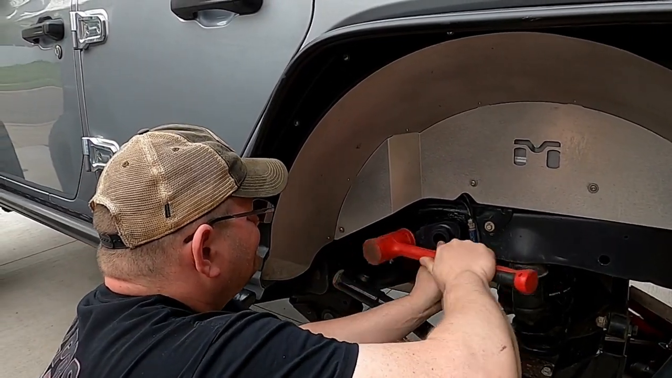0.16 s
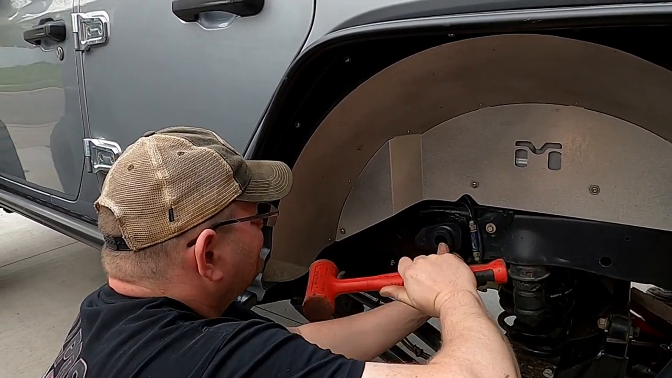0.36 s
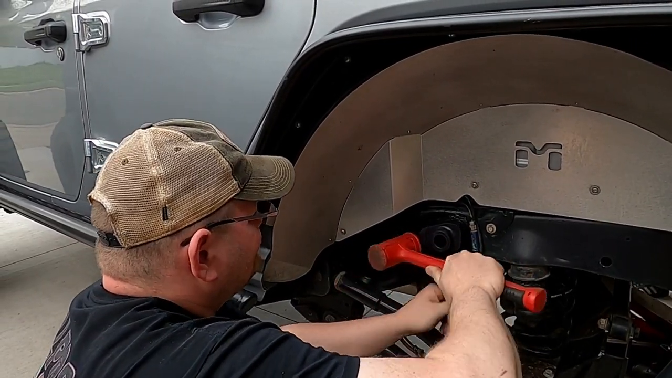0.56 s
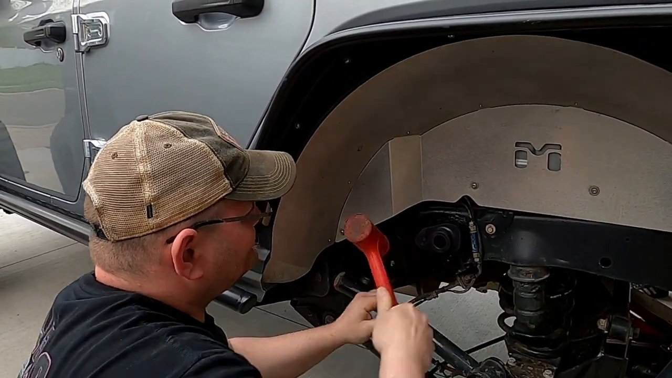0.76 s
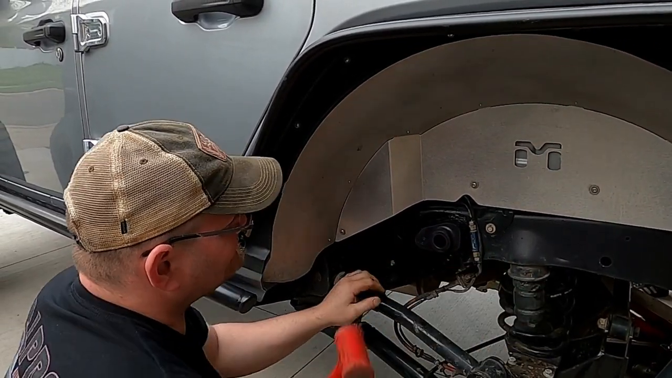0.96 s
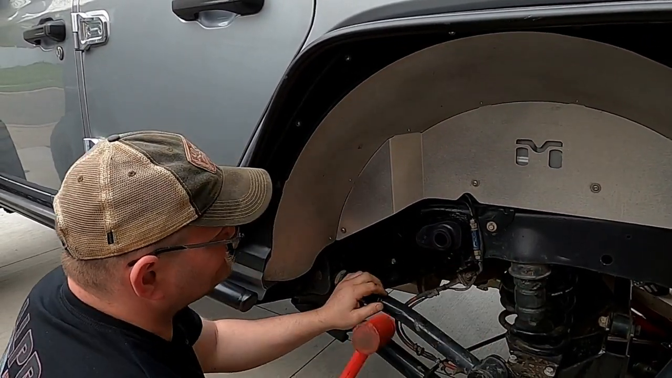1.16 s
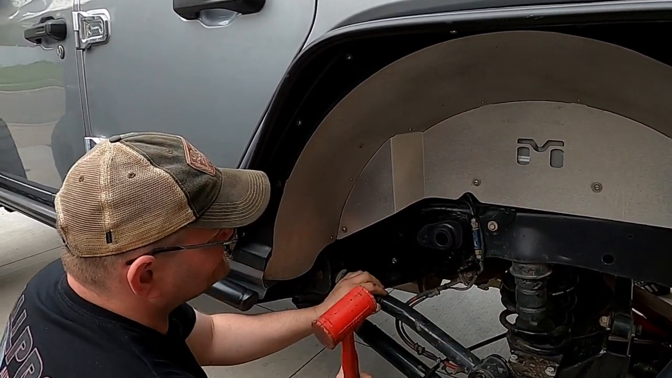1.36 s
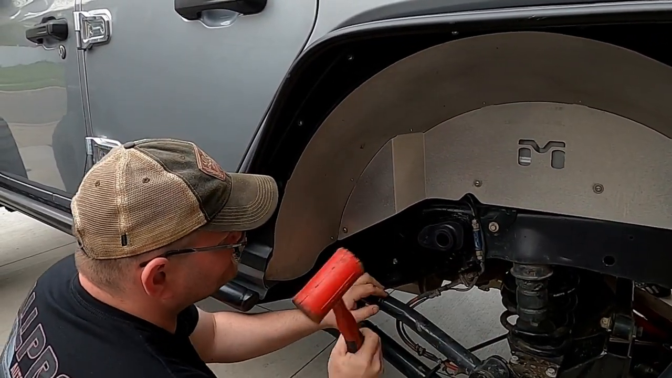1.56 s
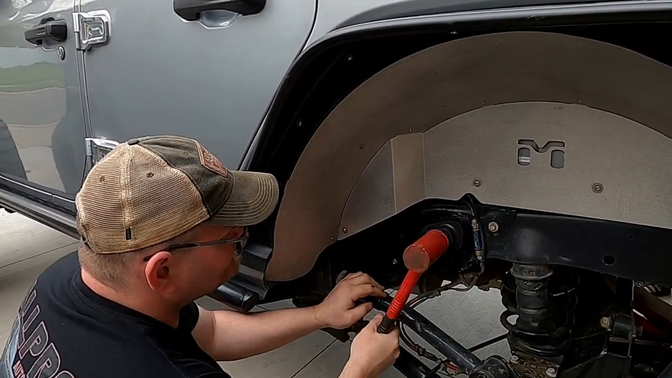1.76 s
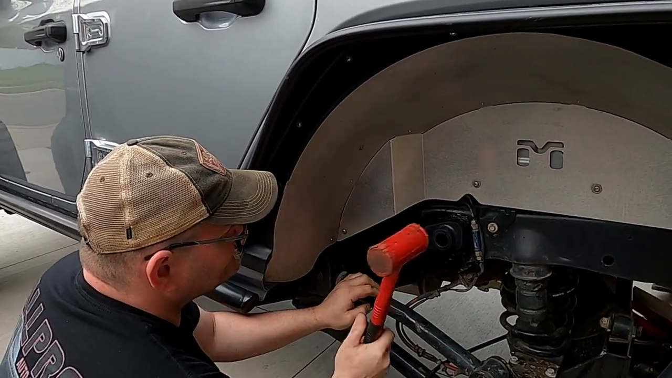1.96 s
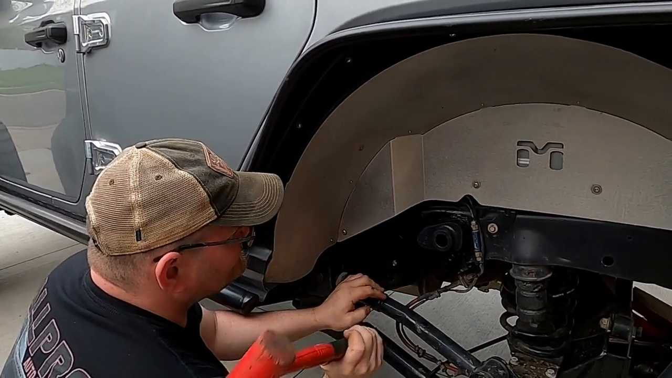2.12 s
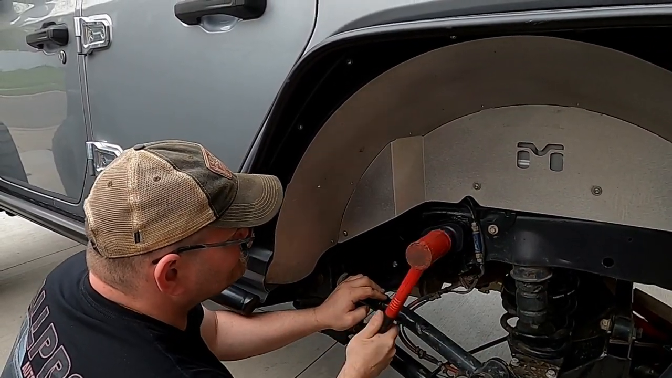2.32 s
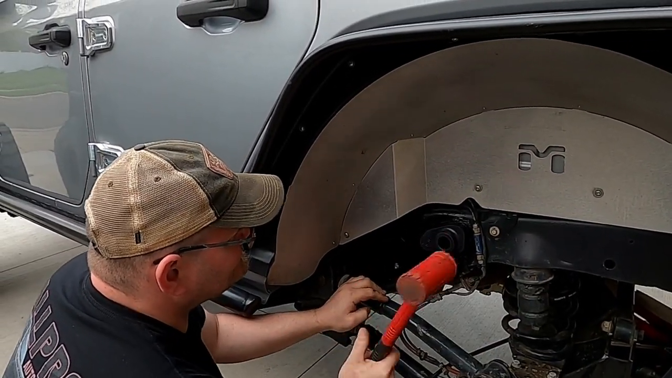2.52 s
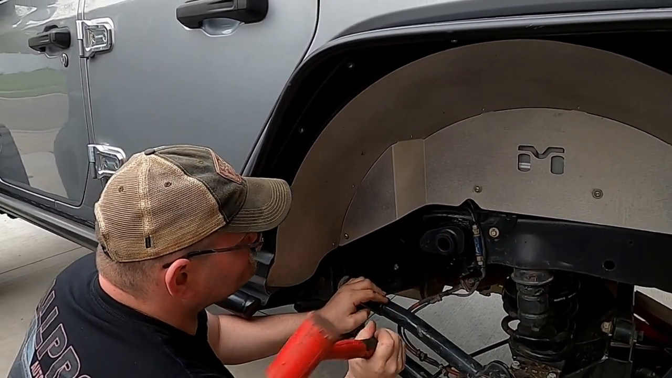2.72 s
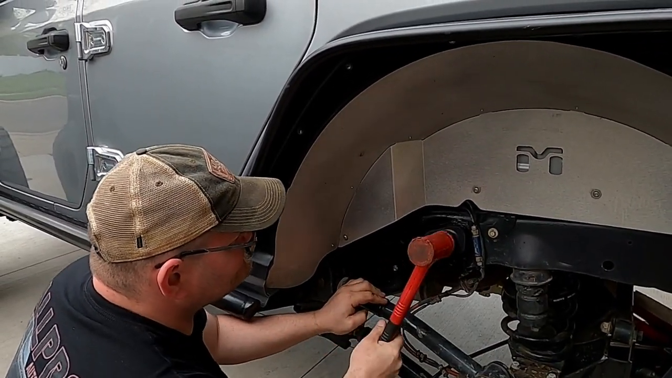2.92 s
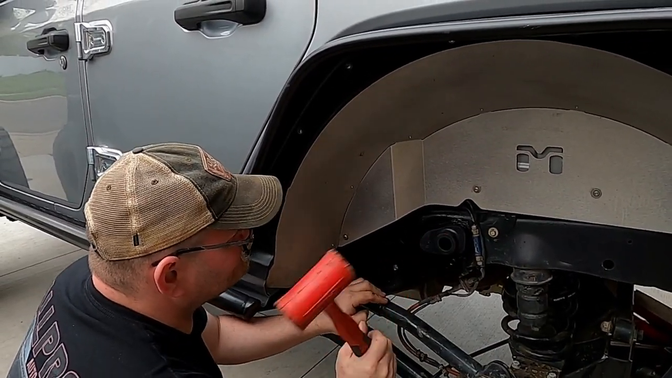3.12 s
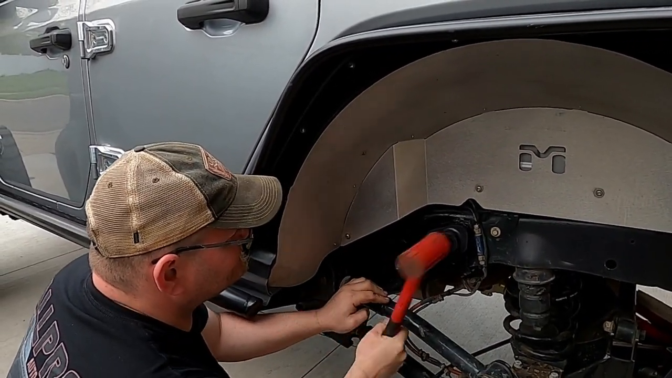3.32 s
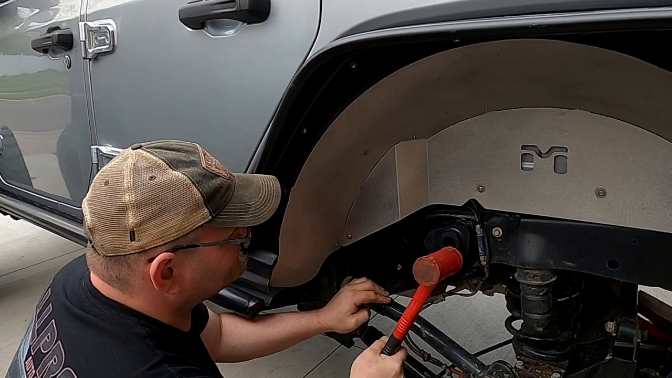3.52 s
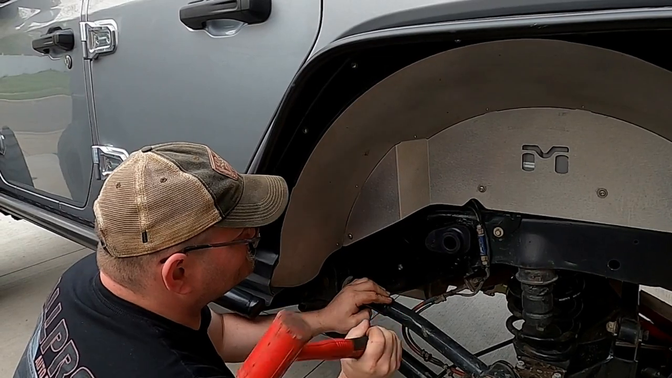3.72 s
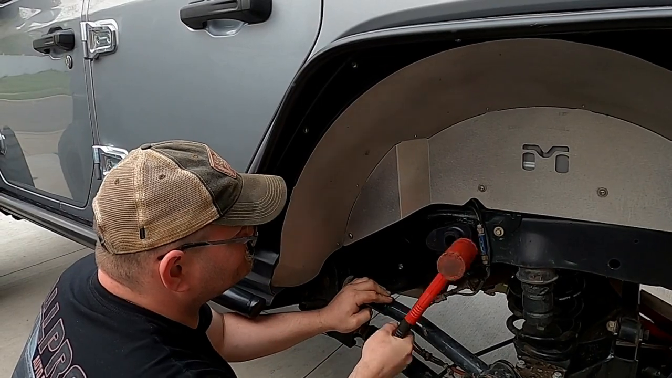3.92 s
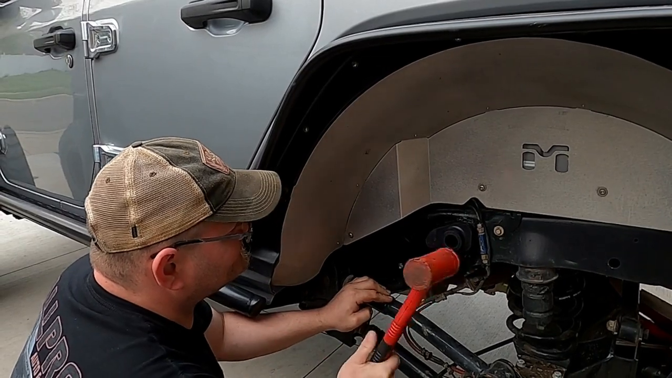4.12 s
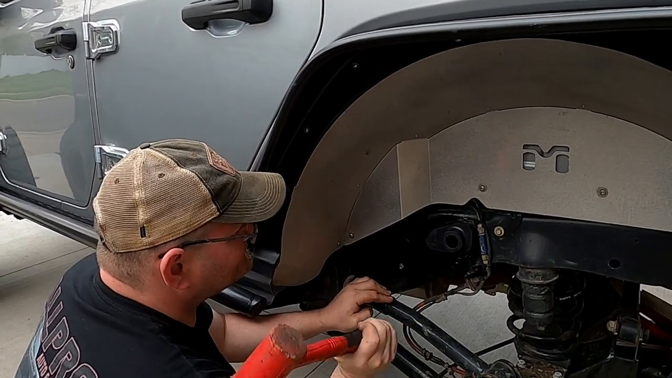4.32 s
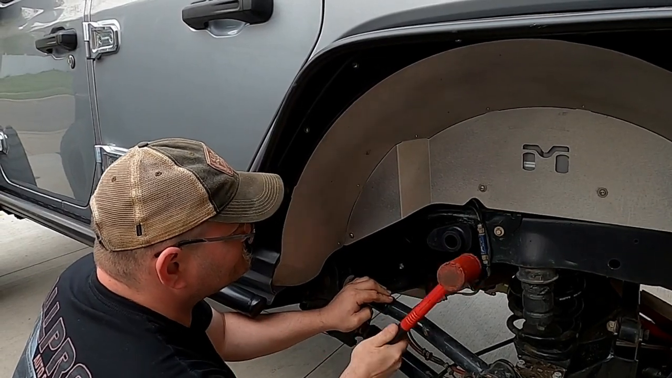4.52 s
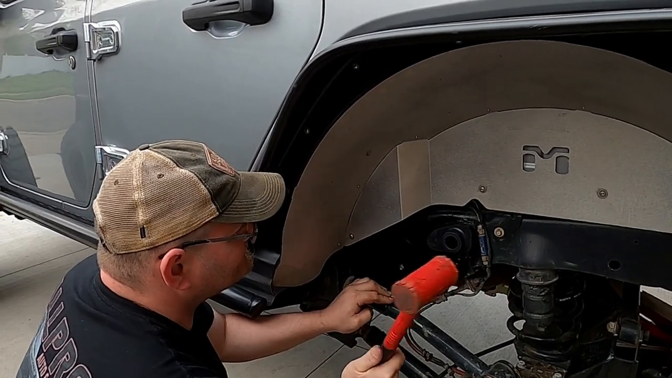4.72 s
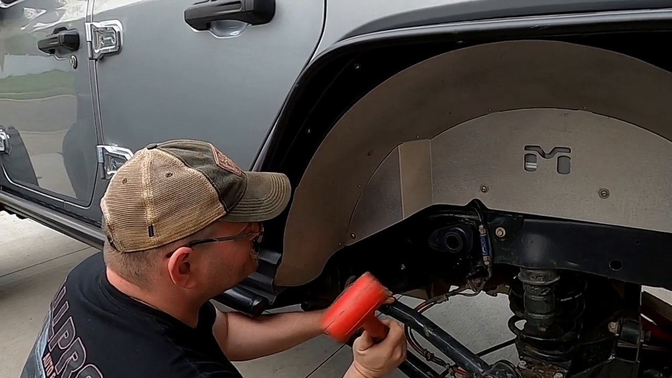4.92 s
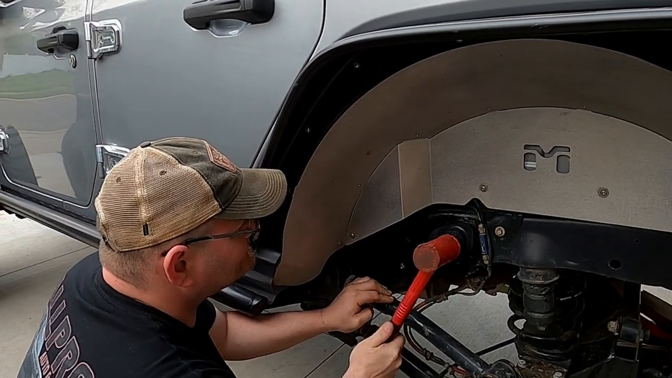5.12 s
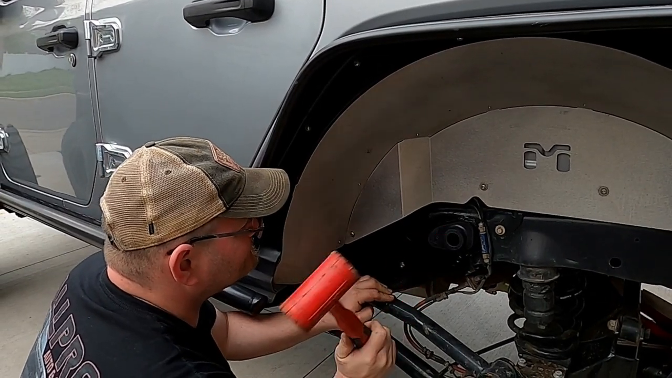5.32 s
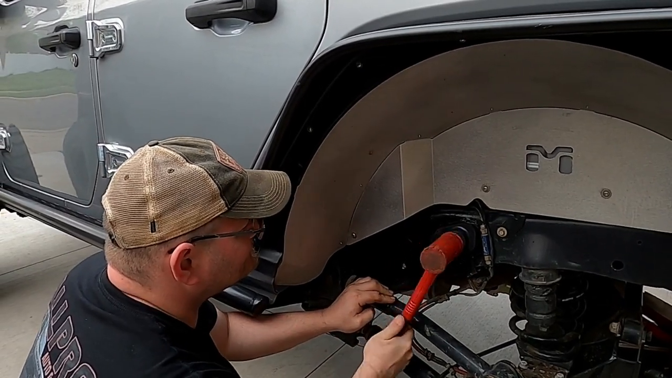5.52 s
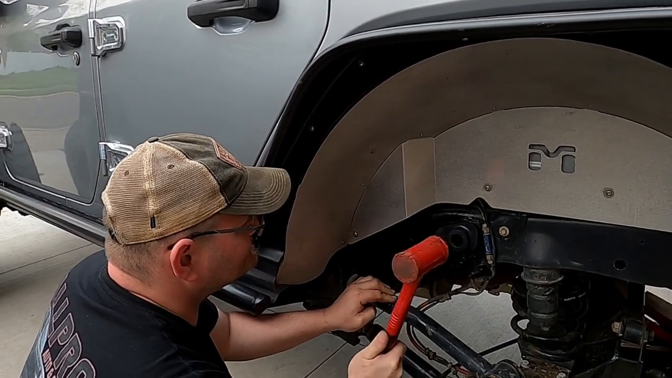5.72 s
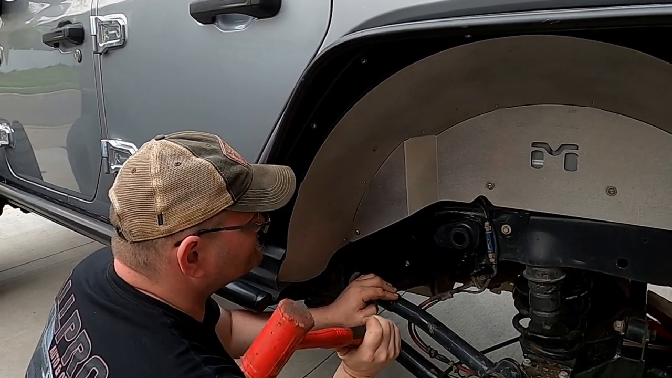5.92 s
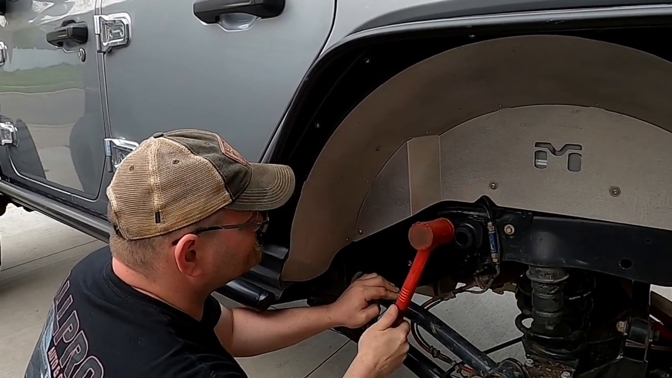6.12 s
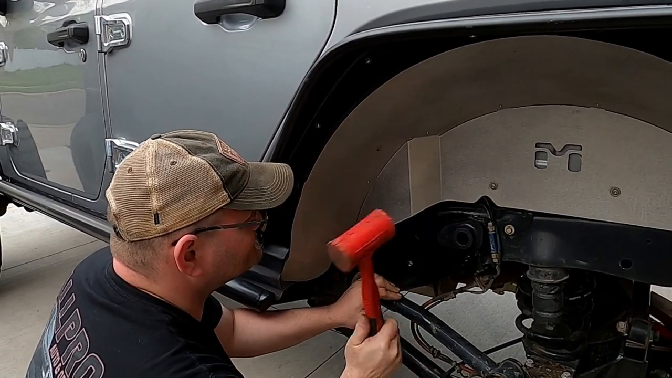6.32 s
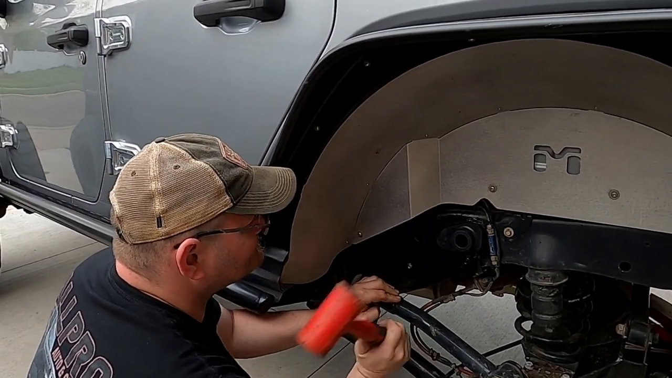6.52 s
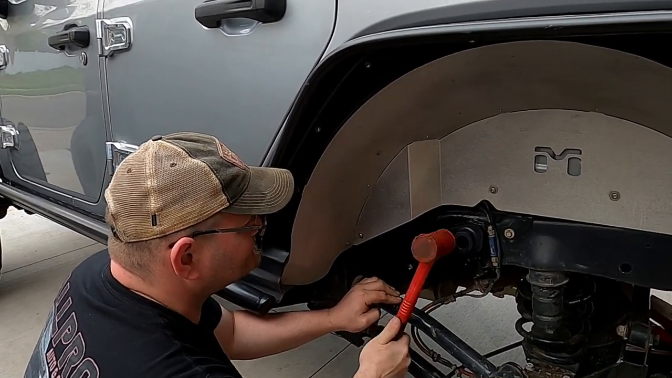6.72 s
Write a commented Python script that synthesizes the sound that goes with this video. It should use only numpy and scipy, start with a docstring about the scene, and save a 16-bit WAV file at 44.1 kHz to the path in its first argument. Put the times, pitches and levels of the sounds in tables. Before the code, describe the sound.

A rubber mallet slams a steel part under a truck, two quick blows, a pause, then steady overloaded clanging thuds with rattling tails and wind bumps.

```python
"""Under a truck's wheel arch in an open garage, a rubber mallet drives a steel part near a small camera.
Each blow is a sum of decaying frame and panel modes, dense bands of ringing noise, a bright slap, buzzing
clips and a slow shake, and it overloads the recorder. Noise bursts make a dying rattle and small ticks; shaped
noise makes the rustle, the hiss and, with windowed low cosines, the wind; a wavering sine and a narrow band
of noise make a faint hum and drone. One microphone feeds both channels, which differ a little in the treble."""
import sys
import numpy as np
from scipy import signal
from scipy.fft import rfft, irfft
from scipy.io import wavfile
from scipy.ndimage import uniform_filter1d

SR = 44100
rng = np.random.default_rng(int(sys.argv[2]) if len(sys.argv) > 2 else 0)


def bounce(signal):
    """Save signal as a 16-bit WAV file at the path given by the first command-line argument."""
    frames = np.transpose(np.atleast_2d(signal))
    limited = np.clip(frames, -1, 1)
    pcm = np.round(limited * 32767).astype(np.int16)
    wavfile.write(sys.argv[1], SR, pcm)


N = 298557  # samples


def undb(db):
    """Decibel law: the amplitude gain of a level in dB."""
    return 10 ** (np.asarray(db) / 20)


def level(x, db):
    """Root-mean-square level: scale a signal to it, in dB."""
    return x * undb(db) / np.sqrt(np.mean(x ** 2))


def curve(rows):
    """Linear interpolation of (seconds, value) rows at every sample."""
    return np.interp(np.arange(N) / SR, *np.transpose(rows))


def fade(t, t60):
    """Exponential decay by 60 dB in t60 seconds, silent before time zero."""
    return (t >= 0) * np.exp(-np.log(1000) * np.maximum(t, 0) / t60)


def band(x, hz, width, order=1):
    """Band-pass filtering about a geometric centre, width in Hz."""
    low = np.sqrt(hz ** 2 + width ** 2 / 4) - width / 2
    high = min(low + width, SR / 2 - 100)
    sos = signal.butter(order, [low, high], "bandpass", fs=SR, output="sos")
    return signal.sosfilt(sos, x)


def coloured(points):
    """Spectral shaping: white noise weighted by (Hz, dB) points along log frequency."""
    hz, db = np.transpose(points)
    f = np.maximum(np.arange(N // 2 + 1) * SR / N, 1)
    gain = undb(np.interp(np.log(f), np.log(hz), db))
    return irfft(rfft(rng.standard_normal(N)) * gain, N)


def walk(rate):
    """Slow random modulation: levels held 1 / rate seconds, then smoothed twice."""
    k = int(SR / rate)
    steps = np.repeat(rng.standard_normal(N // k + 1), k)
    return 1.3 * uniform_filter1d(uniform_filter1d(steps, k), k)[:N]


def add(out, x, s):
    """Superposition: mix a short sound in at s seconds."""
    i = int(s * SR)
    out[i:i + len(x)] += x[:len(out) - i]


# Spectrum of the garage hiss. Each row: frequency in Hz, relative density in dB per Hz.
HISS_SPECTRUM = [(35, -34.5), (60, 9.5), (120, 4), (165, 8), (210, -4.5), (400, -15), (520, -12.5),
                 (690, -8), (800, -23), (1300, -15.5), (1800, -18), (2500, -20), (5000, -25.5), (7500, -35),
                 (12000, -66.5), (16000, -42.5)]
HISS_DB = -44


def hiss():
    """Broadband noise: the hiss of the open garage, its level drifting slightly."""
    return level(coloured(HISS_SPECTRUM), HISS_DB) * undb(0.8 * walk(3.24))


# Swell of the faint hum. Each row: time in seconds, sine amplitude in dB before its random waver.
HUM_SWELL = [(0, -57), (.4, -56), (.9, -53), (1.3, -61), (1.75, -47), (2.0, -70), (2.65, -65.5),
             (2.85, -43), (3.2, -72), (3.85, -52), (4.4, -55), (5.0, -70), (5.8, -57), (6.05, -46),
             (6.3, -53), (6.77, -57)]
HUM_HZ = 284


def hum():
    """Frequency and amplitude modulation: one sine wavering in pitch and strength."""
    pitch = HUM_HZ * (1 + .01 * walk(15))
    phase = 2 * np.pi * np.cumsum(pitch) / SR
    return np.sin(phase) * undb(curve(HUM_SWELL) + 3.5 * walk(11))


DRONE_HZ, DRONE_WIDTH_HZ, DRONE_DB = 167.8, 14, -56


def drone():
    """Narrow-band noise: a low drone with a blurred pitch."""
    return level(band(rng.standard_normal(N), DRONE_HZ, DRONE_WIDTH_HZ), DRONE_DB)


# Strength of the wind rumble. Each row: time in seconds, gain in dB.
RUMBLE_SWELL = [(0.0, -35.5), (0.53, -44), (1.05, -52.5), (1.45, -24.5), (1.68, -22.5), (2.69, -42),
                (3.34, -44.5), (3.58, -38.5), (3.94, -34.5), (4.32, -50), (5.03, -28.5), (5.39, -40.5),
                (6.17, -29), (6.33, -26.5), (6.56, -30), (6.77, -33)]
# Single thumps of wind. Each row: centre in seconds, level in dB, pitch in Hz, length in cycles.
THUMPS = [(1.498, -14, 20, 1.7), (1.537, -5, 17, 1.3), (1.616, -11, 14, 1.14), (1.711, -3.5, 21, 0.58),
          (1.77, -10, 16, 0.74), (1.813, -11, 22, 1.6), (1.982, -7, 17, 0.7), (2.168, -19, 14.5, 1.1),
          (2.233, -17, 12, 1.5), (6.015, -16, 19, 1.9), (6.069, -11, 27, 0.86), (6.22, -7.5, 44, 0.61),
          (6.629, -14.5, 20.5, 5.3), (6.683, -8.5, 21, 2.5)]


def wind():
    """Turbulent pressure on the microphone: lumpy rumble with a weak upper skirt, and single thumps."""
    puffs = rng.standard_normal(N) * undb(3.2 * walk(12))
    rumble = level(band(puffs, 21.0, 22.0, order=2), 3.04)
    skirt = level(band(puffs, 60.0, 97.0, order=2), -12.5)
    out = undb(curve(RUMBLE_SWELL)) * (rumble + skirt)
    t = np.arange(N) / SR
    for s, db, hz, cycles in THUMPS:
        window = np.exp(-((t - s) * hz / cycles * 4.1) ** 2)
        out += undb(db) * window * np.cos(2 * np.pi * (hz * (t - s) + rng.random()))
    return out


# Strength of the rustle. Each row: time in seconds, gain in dB.
RUSTLE_SWELL = [(0, -55), (.9, -52.5), (1.1, -47.5), (1.58, -42), (1.7, -34), (1.83, -40.5), (1.9, -62.5),
                (6.5, -52), (6.77, -37.5)]
# Spectrum of the rustle. Each row: frequency in Hz, relative density in dB per Hz.
RUSTLE_SPECTRUM = [(800, 0), (1600, -8), (3200, -12), (5500, -5.5), (7500, -16), (12000, -18.5),
                   (16000, -14)]


def rustle():
    """Friction noise of cloth and hands: hiss made grainy by rapid level changes."""
    return undb(curve(RUSTLE_SWELL) + 1.5 * walk(60)) * level(coloured(RUSTLE_SPECTRUM), -1.5)


# The dying rattle of an earlier blow at 0 s, then small knocks, ticks and scrapes.
# Each row: start in seconds, gain in dB, centre in Hz, width in Hz, 60 dB decay time in seconds.
RATTLE_AND_TICKS = [(0., -38, 1370, 700, 0.82), (1.021, -32, 5530, 3020, .04),
                    (1.08, -36, 5000, 2500, 0.048), (1.114, -26, 606, 148, 0.12),
                    (1.111, -35, 2000, 1500, 0.053), (1.403, -41, 5500, 3000, 0.068),
                    (1.446, -39, 4970, 3020, 0.078), (1.585, -36.5, 5630, 4000, 0.13),
                    (1.704, -27.5, 3900, 6000, .06), (6.638, -47.5, 5900, 6000, 0.11)]


def rattle_and_ticks():
    """Damped impact noise: a decaying band of noise for each rattle or touch."""
    out, t = np.zeros(N), np.arange(SR // 2) / SR
    for s, db, hz, width, t60 in RATTLE_AND_TICKS:
        noise = level(band(rng.standard_normal(len(t)), hz, width), -3)
        add(out, undb(db) * fade(t, t60) * noise, s)
    return out


def ring(t, hz, db, t60):
    """Free vibration: one exponentially decaying mode."""
    return undb(db) * fade(t, t60) * np.sin(2 * np.pi * hz * t)


# Steel frame and brackets. Each row: mode in Hz before a small random shift, relative level in dB,
# 60 dB decay time in seconds.
FRAME_MODES = [(453, -5, .16), (590, 3.5, .14), (640, -6, .1), (690, 6, .13), (750, -6, .15),
               (831, -2, .15), (960, -10, .2), (1001, -7, .18), (1200, -9, .18), (1308, -9, .12),
               (1416, -6, .16), (1561, -5, .18), (1638, -7, .2), (1758, -6, .2), (1845, -5, .2),
               (1938, -9, .22), (2080, -7, .16), (2175, -10, .2), (2450, -10, .15), (3400, -9, .12),
               (3960, -12, .12)]
KNOCK_DB = -17
HOLLOW_HZ, HOLLOW_SHARE = 900, 0.26  # a hollow blow favours the frame modes under this pitch


def frame_knock(t, bend, share_db, hollow_db):
    """Modal superposition: the frame rings, its modes slightly shifted and reweighted by the blow."""
    out = np.zeros(len(t))
    for k, (hz, db, t60) in enumerate(FRAME_MODES):
        hollow = HOLLOW_SHARE * hollow_db * (hz < HOLLOW_HZ)
        out += ring(t, hz * bend[k], db + share_db[k] + hollow, t60)
    return undb(KNOCK_DB) * out


# Body panels, nearly evenly spaced in pitch, so the thud returns about 37 ms later.
# Each row: mode in Hz, relative level in dB, 60 dB decay time in seconds.
PANEL_MODES = [(51.7, -21.5, .3), (98.1, -6, 0.61), (124.3, 0, 0.53), (151.1, 1.5, 0.26),
               (173.2, 1.5, 0.43), (206.3, -1.5, 0.29), (228.9, 1.5, 0.18), (248, -17.5, 0.39),
               (285.8, -1, 0.22), (319.5, -13, 0.42)]
BOOM_DB = -15
PUSH_S = .0016  # the soft head takes this long to load the part


def panel_boom(t, share_db, boom_db):
    """Modal superposition: the panels boom just after contact, in the opposite polarity."""
    out = np.zeros(len(t))
    for k, (hz, db, t60) in enumerate(PANEL_MODES):
        out -= ring(t - PUSH_S, hz, db + share_db[-k] / 2, t60)
    return undb(boom_db + BOOM_DB) * out


# Countless close modes of the whole truck. Each row: frequency in Hz, early level in dB and its
# 60 dB decay time in seconds, late level in dB and its 60 dB decay time in seconds; blows tilt the levels.
DENSE_MODES = [(370, -31, 0.083, -41, 0.46), (548, -15.5, 0.06, -31, 0.37), (746, -10, 0.09, -34.5, 0.61),
               (1050, -9, 0.069, -42.5, 0.99), (1720, -13.5, 0.12, -48.5, 1),
               (2706, -15.5, 0.1, -44.5, 0.93), (3950, -10, 0.046, -36.5, 0.43),
               (5190, -11.5, 0.088, -30.5, 0.38), (7350, -29.5, 0.03, -42.5, .3),
               (10800, -26, 0.1, -58.5, 0.12), (15720, -34.5, 0.062, -45.5, .12)]


def clatter(t, noise, tilt_db, tail_db, hollow_db):
    """Statistical modal density: half-octave noise bands, each with a quick and a slow decay."""
    hz, *columns = np.transpose(DENSE_MODES)
    out = np.zeros(len(t))
    for f in 360 * 2 ** np.arange(0, 5.6, .5):
        db, t60, slow_db, slow_t60 = (np.interp(np.log(f), np.log(hz), c) for c in columns)
        bright = np.clip(np.log2(f / 1500) / 2, 0, 1)
        dull = np.clip(np.log2(1400 / f), 0, 1)
        early = undb(db + bright * tilt_db) * fade(t, t60)
        late = undb(slow_db + tail_db * (0.5 - dull) + hollow_db * dull) * fade(t, slow_t60)
        shifted = np.roll(noise, int(f))  # keeps the bands unrelated
        out += (early + late) * level(band(shifted, f, f * .42, order=2), 0)
    return out


SLAP_DB = -9.5


def slap(t, noise, crack_db):
    """Impulsive contact: a very short bright burst as the face meets steel."""
    return undb(crack_db + SLAP_DB) * fade(t, 0.017) * level(band(noise, 9600.0, 12000.0), 0)


# Loose clips and lines that buzz on. Each row: centre in Hz, width in Hz, 60 dB decay time in seconds.
LOOSE_PARTS = [(1893, 560, 0.88), (3585, 830, 0.83), (5340, 890, 0.88)]
BUZZ_FALL_DB = 7  # per octave away from the loosest buzz


def buzz(t, noise, buzz_db, loosest_hz):
    """Rattling contact: slowly decaying noise bands, strongest near the loosest pitch."""
    out = np.zeros(len(t))
    for hz, width, t60 in LOOSE_PARTS:
        db = buzz_db - BUZZ_FALL_DB * abs(np.log2(hz / loosest_hz))
        out += fade(t, t60) * level(band(noise, hz, width, order=2), db)
    return out


SHAKE_DB, SHAKE_HZ, SHAKE_WIDTH_HZ = -19.5, 38, 54
SHAKE_T60_S, SHAKE_RISE_S = 0.5, 0.14  # 60 dB times of the decay and of the onset


def shake(t, noise):
    """Mass-spring oscillation: the truck rocks on its springs, as low noise that swells and decays."""
    swell = fade(t, SHAKE_T60_S) - fade(t, SHAKE_RISE_S)
    return swell * level(band(noise, SHAKE_HZ, SHAKE_WIDTH_HZ), SHAKE_DB)


# Mallet blows. Each row: start in seconds, strength in dB, boom in dB, crack in dB, tail in dB,
# hollowness in dB, buzz in dB, pitch of the loosest buzz in Hz; the levels are relative.
MALLET_BLOWS = [(0.1914, -1.5, -5, 7, 6, 7, -34.5, 4400), (0.559, 0.5, -9, 0, -12, -2.5, -36.5, 1700),
                (1.8519, 4, -2.5, 4, -7.5, -2, -47.5, 5200), (2.388, 3, -2.5, 1.5, -2.5, -0.5, -39.5, 1900),
                (2.917, 1.1, -2, 8, 10.5, 2.5, -34.5, 3600), (3.445, 2.5, -5, 2.5, 3, 1, -34, 2400),
                (3.977, 2.5, -2.5, 4.5, 3.5, -1.5, -33, 2200), (4.555, 3.6, -6.5, 2.5, 1, -2.5, -38, 1900),
                (5.094, 2.2, -5, 4.5, 6, 0.5, -32, 2000), (5.616, 1.5, -2, 6.5, 11.5, 6.5, -33.5, 2500),
                (6.158, -3, 4, 12, 4, 17, -32, 4200), (6.699, -3.5, 5, 13, 3, 20.5, -29, 3600)]


def mallet():
    """Modal excitation: each blow lands a little differently, so the share of the modes changes."""
    out, t = np.zeros(N), np.arange(SR) / SR
    # noise shared by all blows, mixed with a larger fresh part in the clatter of each
    shared = rng.standard_normal(len(t))
    for s, db, boom_db, crack_db, tail_db, hollow_db, buzz_db, buzz_hz in MALLET_BLOWS:
        spot = rng.standard_normal((2, 32))
        fresh = rng.standard_normal((4, len(t)))
        bend, share_db = 1 + .004 * spot[0], 1.8 * spot[1]
        blow = frame_knock(t, bend, share_db, hollow_db)
        blow += panel_boom(t, share_db, boom_db)
        blow += clatter(t, 0.48 * shared + 0.74 * fresh[0], crack_db, tail_db, hollow_db)
        blow += slap(t, fresh[2], crack_db)
        blow += buzz(t, fresh[1], buzz_db, buzz_hz)
        blow += shake(t, fresh[3])
        add(out, undb(db) * blow, s)
    return out


def scene():
    """Sum and difference stereo: one microphone in both channels with a trace of unlike treble."""
    mid = hiss() + hum() + drone() + wind() + rustle() + rattle_and_ticks() + mallet()
    trace = undb(-26.5) * (band(mid, 9000., 8300.0) + undb(-33.5) * mid)
    side = trace * np.sign(walk(900))  # random changes of polarity
    return np.array([mid + side, mid - side])


TOP_HZ = 15900


def record(dry):
    """Saturation and low-pass filtering: overload flattens, the sealed housing dulls, the top is cut."""
    flat = dry / (1 + np.abs(dry) ** 5) ** (1 / 5)
    dull = signal.sosfilt(signal.butter(1, 7000, fs=SR, output="sos"), flat)
    cut = signal.sosfilt(signal.ellip(8, .2, 70, TOP_HZ, fs=SR, output="sos"), dull)
    return np.clip(cut, -1, 1)


dry = scene()
out = record(dry)
bounce(out)
```